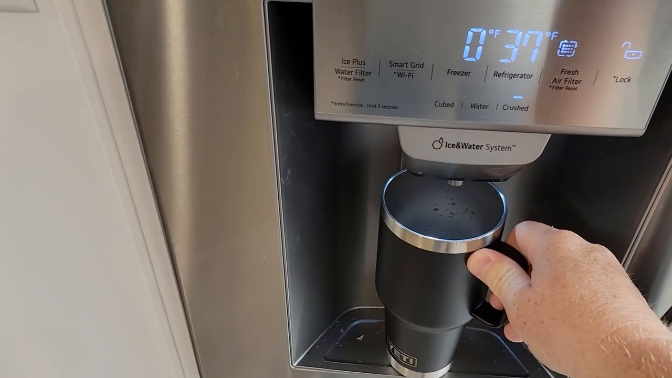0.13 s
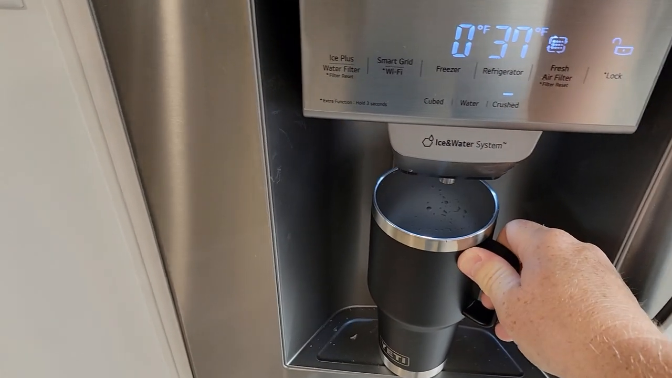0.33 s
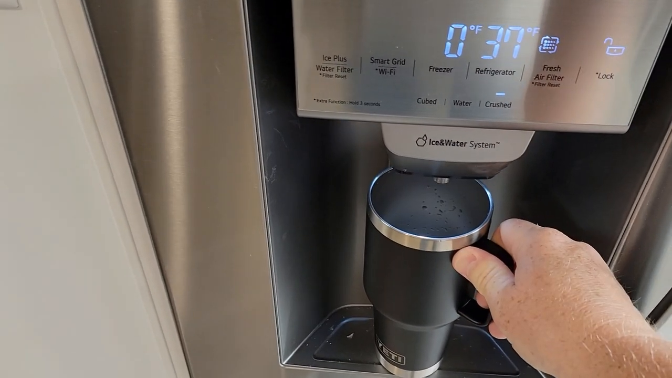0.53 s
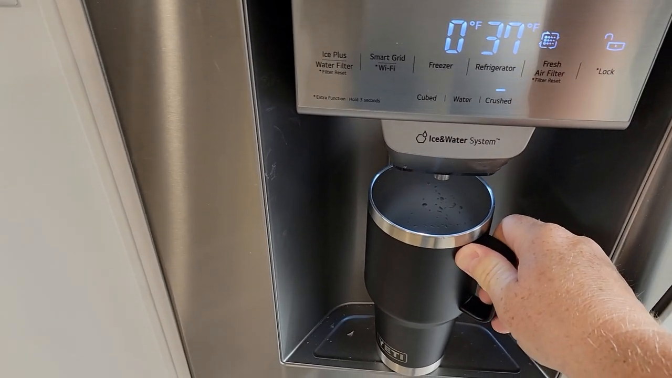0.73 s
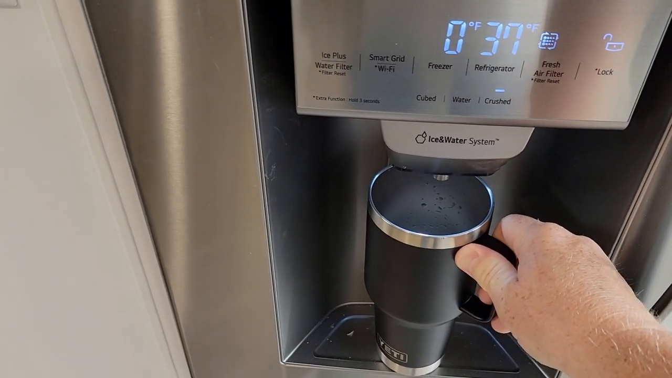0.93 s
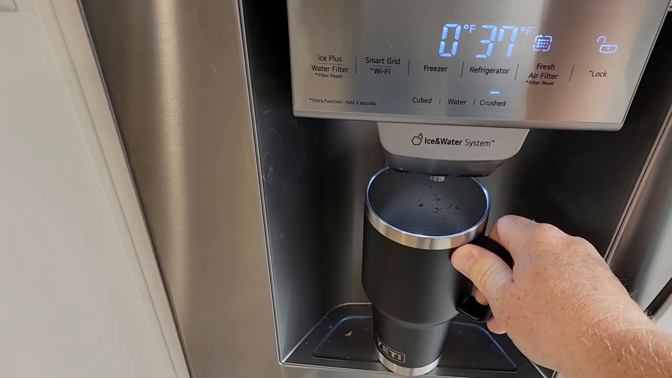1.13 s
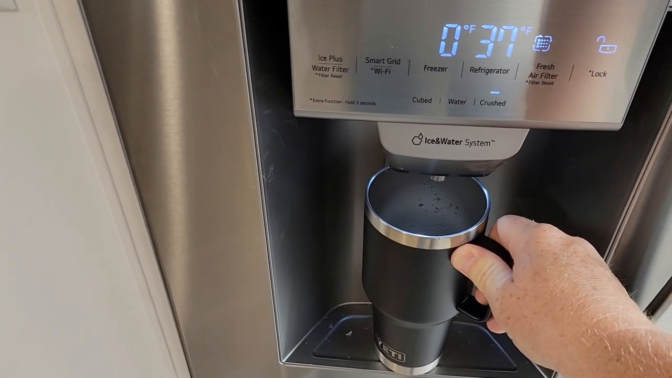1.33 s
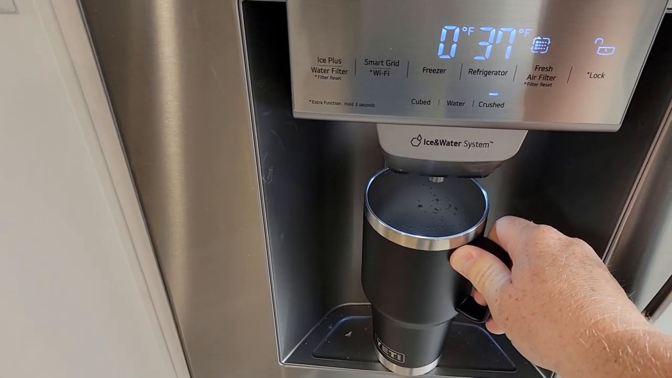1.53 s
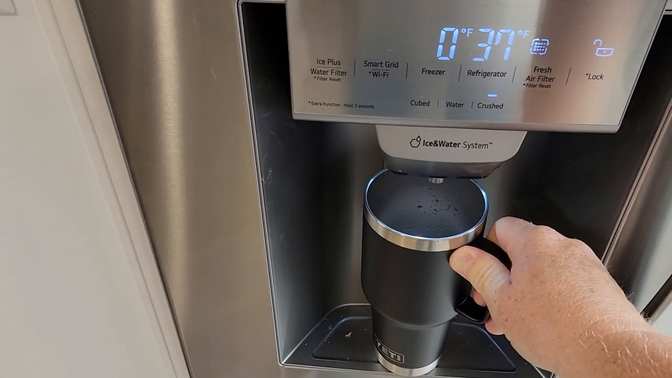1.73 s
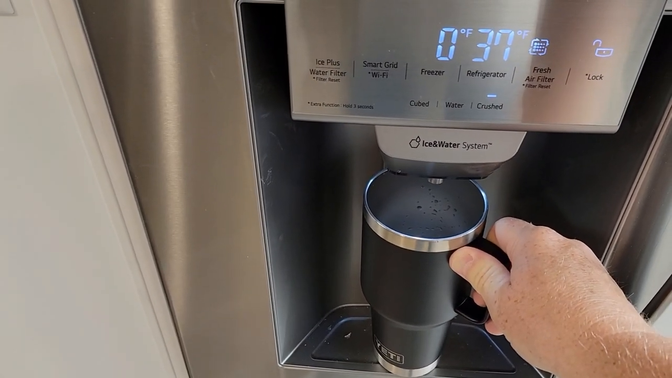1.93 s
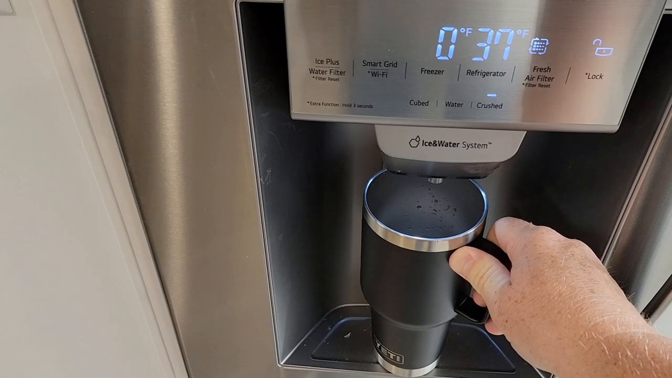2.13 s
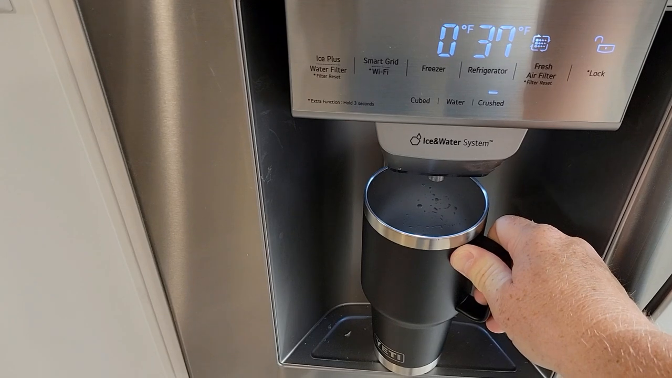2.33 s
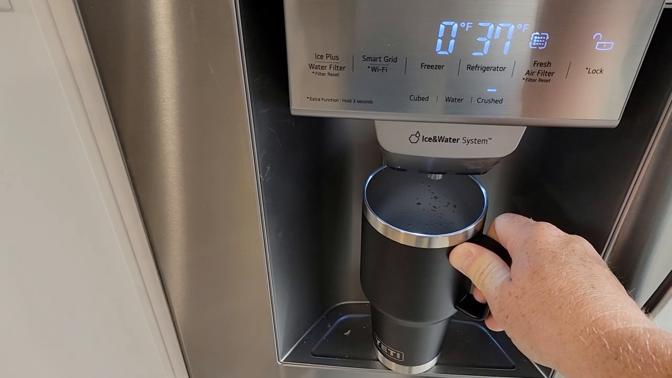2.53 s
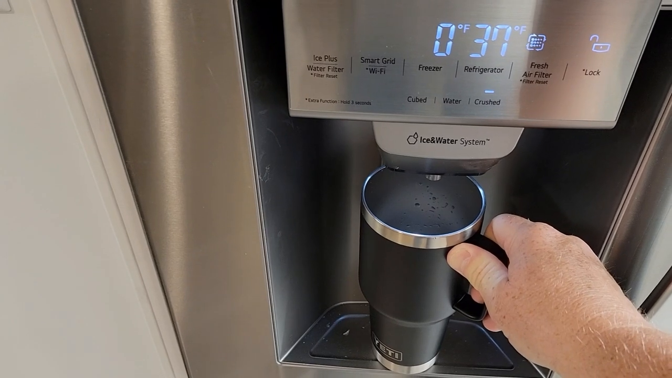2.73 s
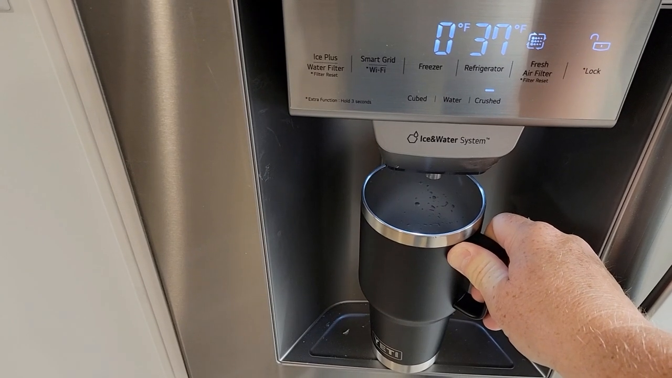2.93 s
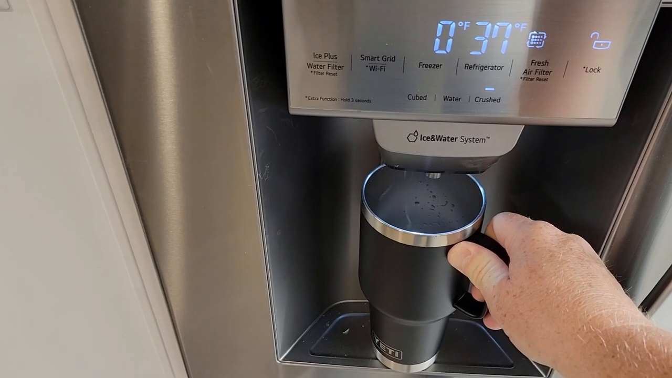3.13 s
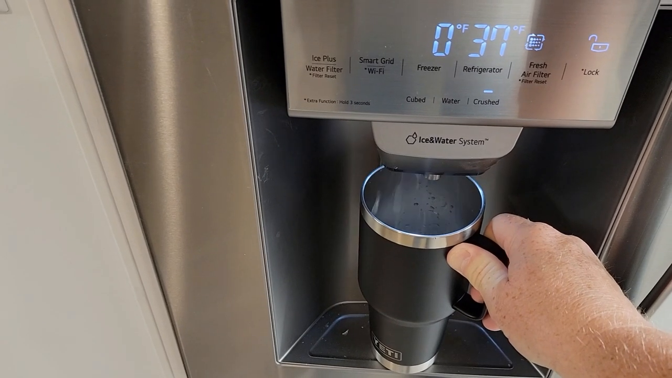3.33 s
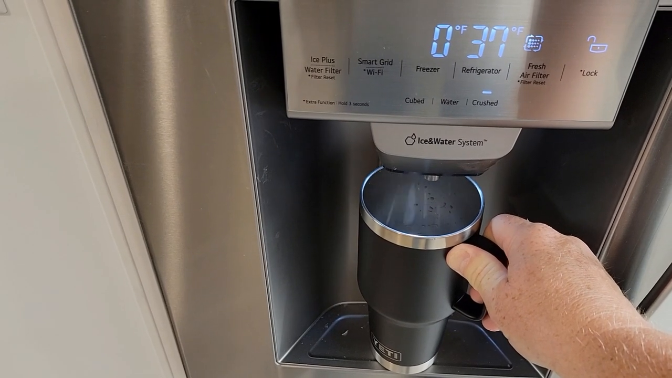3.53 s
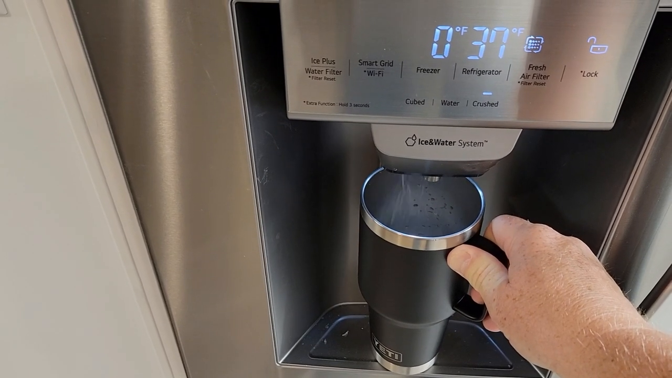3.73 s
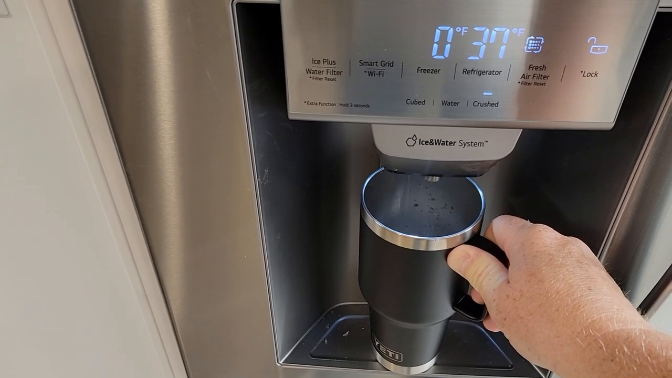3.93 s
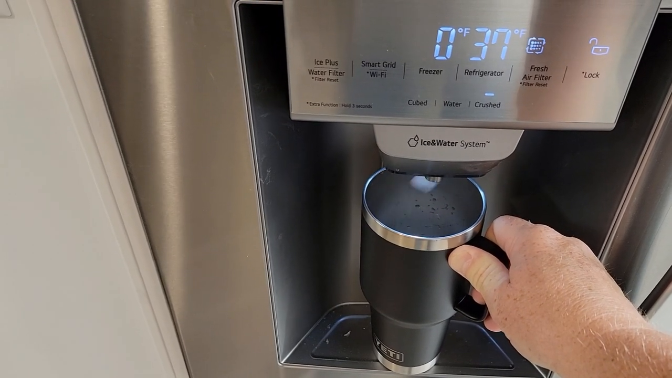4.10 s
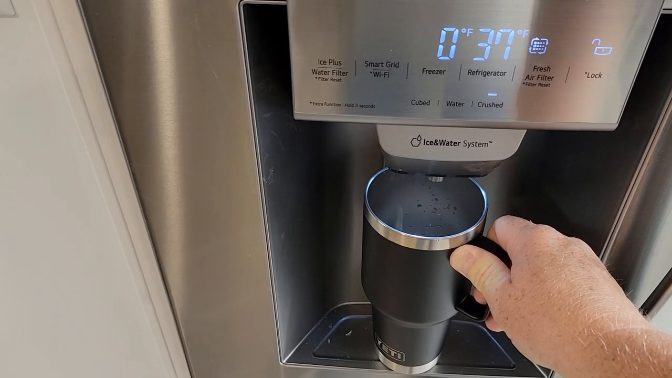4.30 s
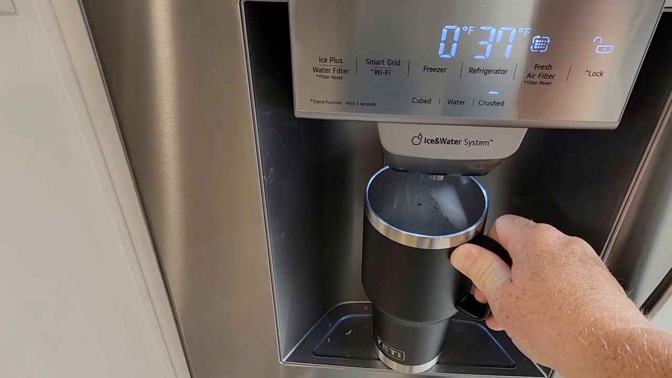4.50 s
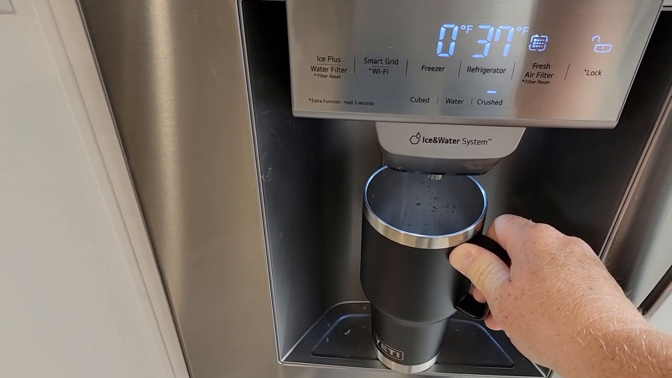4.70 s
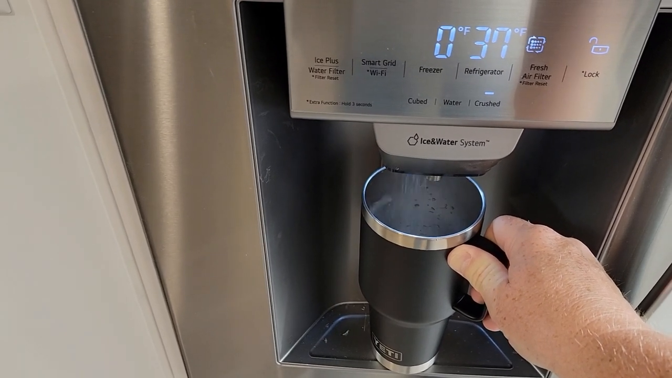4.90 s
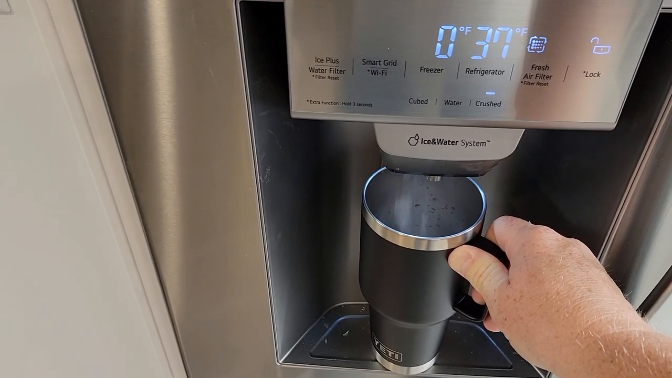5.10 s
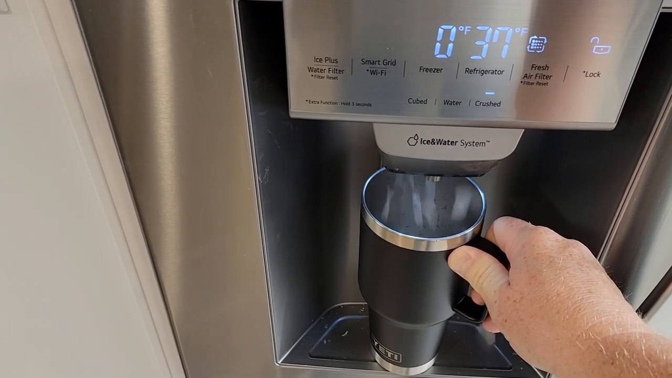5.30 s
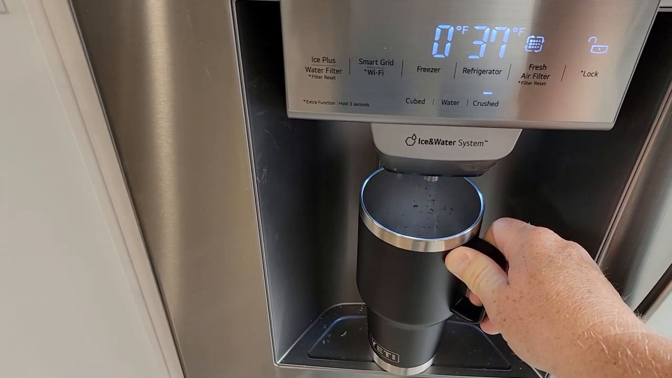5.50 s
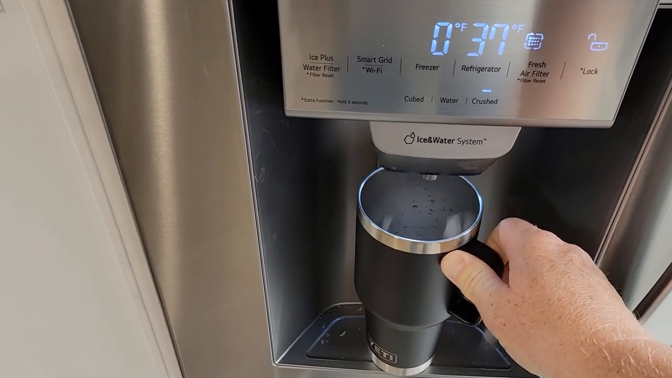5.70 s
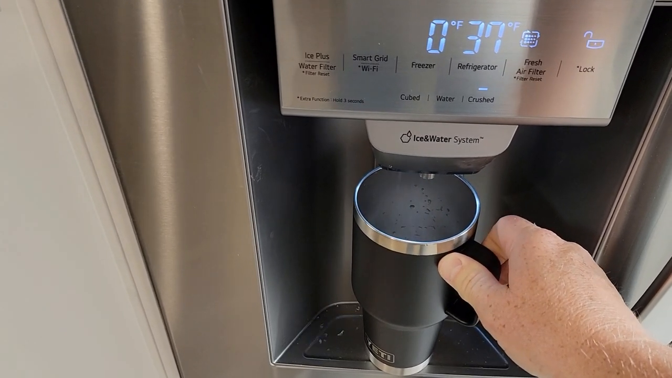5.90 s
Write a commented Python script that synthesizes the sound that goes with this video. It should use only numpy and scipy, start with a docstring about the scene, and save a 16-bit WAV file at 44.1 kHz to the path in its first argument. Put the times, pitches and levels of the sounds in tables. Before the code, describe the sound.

Nearly mono close microphone, dry indoor air with low compressor hum. Quiet creaks and a dull clunk come first, then a little geared motor runs up and holds a wavering whine. Muffled ticks and knocks thicken into loud, uneven crunching through a hollow cabinet, with fizzing ice splinters and scattered bright metallic clinks of chips dropping into a tumbler.

```python
"""An ice crusher in a refrigerator door grinds ice, and the chips clink into a steel tumbler, heard close up.
The grinding is clumpy noise through the cabinet's resonances, with a hiss of splinters on top. Single blows
are short notes with noise, and chips are noise cracks with brief notes and the tumbler's ring.
Before that the lever creaks, the chute flap clunks open and a small motor whines up, all made from tones
and noise. Behind everything the compressor hums, the room hisses and the door shakes."""
import sys
import numpy as np
from scipy import signal
from scipy.fft import rfft, irfft, next_fast_len
from scipy.io import wavfile
from scipy.ndimage import map_coordinates

SR = 44100
rng = np.random.default_rng(int(sys.argv[2]) if len(sys.argv) > 2 else 0)


def master(y):
    """Save y as 16-bit WAV."""
    cut = np.clip(np.atleast_2d(y).T, -1, 1)
    pcm = np.round(cut * 32767)  # scale
    wavfile.write(sys.argv[1], SR, pcm.astype(np.int16))


N = 266849  # length [samples]


def amp(db):
    """Turns decibels into a gain."""
    return 10 ** (np.asarray(db) / 20)


def unit(x):
    """Scales a sound to an rms of one."""
    return x / np.sqrt(np.mean(x ** 2) + 1e-20)


def seconds(count=N):
    """The time of each sample."""
    return np.arange(count) / SR


def curves(rows):
    """One value per sample for each column after the time."""
    s, *cols = np.transpose(rows)
    return [np.interp(seconds(), s, c) for c in cols]


def wobble(rate):
    """A smooth random curve with this many random points a second."""
    at = np.arange(0, N + 32, 32)
    points = rng.standard_normal(int(N * rate / SR) + 4)
    return np.interp(np.arange(N), at, map_coordinates(points, [at * rate / SR]))


def wobbles(rate, count):
    """Several independent wobbles, one per row."""
    return np.array([wobble(rate) for _ in range(count)])


def filtered(x, response):
    """Filters a sound by a (complex) response of frequency."""
    m = next_fast_len(N + SR // 2)
    return irfft(rfft(x, m) * response(np.fft.rfftfreq(m, 1 / SR)), m)[..., :N]


def colour(points):
    """Filter gain through (frequency [Hz], level [dB]) points on a log axis."""
    f, db = np.transpose(points)
    return lambda hz: amp(np.interp(np.log(hz + 1), np.log(f + 1), db))


def add(track, s, sound):
    """Mixes a sound in at a time."""
    track[round(s * SR):][:len(sound)] += sound


def swells(rows, fall_s):
    """Gain of (time [s], level [dB], rise [s]) peaks; rise and fall are times for 10 dB."""
    t = seconds()
    peaks = [amp(db - 10 * np.maximum((s - t) / rise_s, (t - s) / fall_s)) for s, db, rise_s in rows]
    return np.max(peaks, axis=0)


def grains(spread_db, life, clump_db, bed, count):
    """Dense noise puffs of unequal size with sharp fronts, in clumps; the streams share some of them."""
    sizes = amp(spread_db * np.minimum(rng.exponential(size=(count + 1, N)), 3.5))
    starts = rng.random((count + 1, N)) < 250 / SR  # about 250 puffs a second
    puffs = signal.lfilter([1], [1, -amp(-60 / SR / life)], sizes * starts)  # life: 60 dB decay [s]
    clumps = amp(clump_db * (wobble(30) + 0.87 * wobbles(25, count)))
    return (0.81 * puffs[0] + puffs[1:] + bed) * clumps * rng.standard_normal((count, N))


# resonances of cabinet and chute: (frequency [Hz], width of one pass [Hz], level [dB])
CABINET_MODES = [(172.2, 110, -12.5), (303, 113, -2), (398, 120, -3.5), (517, 150, -4), (708, 179, -0.5),
                 (954, 167, -3), (1192, 190, -5.5), (1600, 165, -5), (1850, 230, -13), (2400, 200, -18)]
SHUT_FROM_S, SHUT_UNTIL_S, SHUT_ABOVE_HZ, SHUT_DB = 1.22, 1.8, 1400, -7


def cabinet(drive):
    """One row per resonance, each applied twice for steep skirts; upper ones are quieter at motor run-up."""
    c, w, db = np.transpose(CABINET_MODES)[:, :, None]
    t = seconds()
    # above 2000 Hz the quiet stretch already begins at the start
    quiet = (c > SHUT_ABOVE_HZ) * (t < SHUT_UNTIL_S) * ((t > SHUT_FROM_S) | (c > 2000))
    resonance = lambda f: amp(db) * (f * w / (c * c - f * f + 1j * f * w)) ** 2
    return filtered(drive * amp(SHUT_DB * quiet), resonance)


# room tone and hiss: (frequency [Hz], level [dB])
ROOM_COLOUR = [(15, -64), (25, -34), (63, -15), (91, -12), (124, -2), (208, -19), (269, -13), (450, -20),
               (1090, -59), (2500, -59), (4600, -58), (5120, -48), (5700, -56), (15600, -57), (22000, -120)]


def room():
    """Steady noise shaped like the air of a kitchen."""
    return amp(-61) * unit(filtered(rng.standard_normal(N), colour(ROOM_COLOUR)))


# compressor hum before its wobble: (time [s], level [dB])
HUM_LEVEL = [(0.0, -52), (0.6, -52), (2.0, -46.5), (3.0, -46), (3.2, -51), (3.5, -48), (6.05, -46)]
HUM_HZ = 120


def compressor():
    """A hum is one low tone whose level and phase drift a little."""
    level = amp(HUM_LEVEL_DB() + 0.57 * wobble(12))
    return np.sqrt(2) * level * np.sin(2 * np.pi * HUM_HZ * seconds() + .25 * wobble(6))


def HUM_LEVEL_DB():
    """The hum level at every sample."""
    return curves(HUM_LEVEL)[0]


# the door is jolted: (start of the last 10 dB of rise [s], level [dB])
DOOR_JOLTS = [(2.962, -48), (3.145, -39), (3.292, -51), (3.453, -44), (3.728, -50), (3.8, -49),
              (3.997, -49), (4.5, -46), (4.57, -46), (4.71, -45), (4.926, -45), (5.642, -47), (5.766, -44),
              (5.85, -48)]
JOLT_RISE_S, JOLT_FALL_S = .02, .035  # for 10 dB
SHAKE_DB, SHAKE_UNDER_GRIND_DB = -68, -38  # at rest; relative to the steady grinding
THUD_S, THUD_DB, THUD_HZ, THUD_HALF_S = .16, -37, 105, .011


def door():
    """A heavy panel shakes as low noise, stronger with grinding and jolts; one soft bump is a short low tone."""
    noise = amp(2.7 * wobble(14)) * rng.standard_normal(N)
    shake = filtered(noise, colour([(15, -40), (40, -18), (80, 0.5), (200, -18), (400, -62)]))
    jolts = swells([(s + JOLT_RISE_S, db, JOLT_RISE_S) for s, db in DOOR_JOLTS], JOLT_FALL_S)
    strength = amp(SHAKE_DB) + amp(curves(GRINDING)[0] + SHAKE_UNDER_GRIND_DB) + jolts
    t = seconds() - THUD_S
    bump = amp(THUD_DB) * np.exp(-(t / THUD_HALF_S) ** 2) * np.cos(2 * np.pi * THUD_HZ * t)
    return strength * unit(shake) + bump


# noise tail of an earlier clack: (frequency [Hz], level [dB])
CLACK_COLOUR = [(600, -20), (1400, -6), (1700, 5), (2100, -8), (3600, -3), (5000, -3), (9000, -6),
                (15500, -14), (16400, -40)]
# tones still ringing from it: (frequency [Hz], level [dB], 60 dB decay [s])
CLACK_TONES = [(1680, -60, .6), (3650, -70, .4), (4940, -72, .4)]


def clack_tail():
    """What is left of an earlier clack dies away as fading noise and tones."""
    t = seconds()
    tail = amp(-54 - 60 * t / 0.3) * unit(filtered(rng.standard_normal(N), colour(CLACK_COLOUR)))
    for hz, db, t60 in CLACK_TONES:
        tail = tail + amp(db + 3 * wobble(60) - 60 * t / t60) * np.sin(2 * np.pi * hz * t)
    return tail


# small motor: (time [s], whine [Hz], whine level [dB], overtone level [dB], low order level [dB])
MOTOR_WHINE = [(1.1, 440, -120, -120, -120), (1.18, 491, -80, -66, -90), (1.27, 560, -64, -69, -85),
               (1.4, 654, -59, -63, -80), (1.49, 722, -58, -68, -66), (1.56, 775, -48.5, -78, -59),
               (1.63, 832, -56, -90, -62), (1.69, 880, -63, -92, -62), (1.77, 942, -45.5, -92, -66),
               (1.86, 1008, -47.5, -86, -69), (2.2, 1008, -47, -83, -70), (2.7, 1005, -44.5, -82, -73),
               (6.05, 1003, -43, -80, -72)]


def motor():
    """Gear mesh whine, an overtone and other shaft orders all follow the speed; load makes it waver."""
    hz, db, octave_db, low_db = curves(MOTOR_WHINE)
    load = np.interp(seconds(), [1.8, 2.1, 2.8], [.005, .003, .01])
    turn = 2 * np.pi * np.cumsum(hz * (1 + load * wobble(60))) / SR
    orders = np.sin(0.405 * turn) + 0.4 * np.sin(0.59 * turn)
    orders = orders + .3 * np.sin(1.19 * turn) + .2 * np.sin(1.55 * turn)
    tone = amp(db) * np.sin(turn) + amp(octave_db) * np.sin(2 * turn) + amp(low_db) * orders
    return np.sqrt(2) * amp(3.5 * wobble(45)) * tone


# faint ticks in the ice bin and lever, before muffling: (time [s], level [dB])
BIN_TICKS = [(0.4365, -61), (0.7478, -63), (1.0352, -57), (1.1364, -40), (1.8094, -51), (1.8458, -49),
             (1.9546, -45), (1.977, -36), (2.0758, -44), (2.1242, -49), (2.192, -48), (2.2509, -46),
             (2.2958, -50), (2.3631, -47), (2.4026, -35), (2.4829, -38), (2.6166, -36), (2.648, -39),
             (2.7118, -43)]
# tone colour heard through the door: (frequency [Hz], level [dB])
MUFFLED_COLOUR = [(1530, -32), (2810, -24), (3300, -12), (4500, -8), (4980, 0), (5500, -7), (6100, -5),
                  (6900, -7), (8000, -22), (15600, -37), (22000, -120)]


def ticks():
    """Short dull clicks are noise bursts with a little tail, muffled by the door."""
    puff, t = np.zeros(N + SR), seconds(SR // 5)
    for s, db in BIN_TICKS:
        fade = amp(db - 1 - 60 * t / 0.035) + amp(db - 10 - 60 * t / .25)
        add(puff, s, fade * rng.standard_normal(len(t)))
    return filtered(puff[:N], colour(MUFFLED_COLOUR))


# blows of lever, flap and breaking ice: (time [s], relative level [dB], pitch [Hz], 60 dB decay [s])
CABINET_BLOWS = [(0.747, -41, 1240, 0.032), (0.8, -37, 307, 0.05), (0.829, -32, 708, 0.04),
                 (0.882, -39, 383, 0.05), (1.034, -43.5, 750, 0.047), (1.135, -26, 452, .07),
                 (1.139, -21, 296, 0.1), (1.163, -34, 320, .05), (1.822, -25.5, 983, 0.05),
                 (1.957, -25, 1000, 0.06), (2.24, -27, 1012, 0.059), (2.4, -22.5, 750, 0.052),
                 (2.499, -23, 980, 0.05), (2.568, -18.5, 742, 0.05), (2.678, -12.5, 710, 0.05),
                 (2.933, -7, 467, 0.05), (2.955, -7, 450, 0.04), (2.98, -3.5, 718, 0.05),
                 (3.08, -13, 900, .04), (3.126, -3.5, 581, 0.05), (3.157, 1.5, 520, 0.035),
                 (3.226, -7, 1000, 0.05), (3.294, -9, 757, 0.05), (3.463, -10.5, 464.4, 0.05),
                 (3.688, -13, 299, 0.08), (3.729, -2, 694, 0.039), (3.795, -9, 980, 0.05),
                 (3.982, -13.5, 996, 0.048), (4.008, -17, 1200, .03), (4.053, -13.5, 1530, 0.038),
                 (4.42, -6, 730, 0.047), (4.459, -8, 684, .04), (4.494, -7, 832, 0.047),
                 (4.564, -7.5, 910, 0.054), (4.659, -9, 299, 0.091), (4.787, -8, 388, .06),
                 (4.814, -8, 361, .04), (4.932, -5, 390, 0.045), (4.972, -14, 431, .04),
                 (5.061, -10, 900, .04), (5.075, -9, 700, .04), (5.161, -11, 711, .04),
                 (5.402, -15, 1490, 0.04), (5.463, -13, 1450, .04), (5.592, -6.5, 1189, 0.05),
                 (5.635, -10, 700, .04), (5.803, -9, 690, 0.048), (5.817, -3, 1750, .03),
                 (5.83, -10, 700, .03), (5.873, -12, 1300, .03), (5.897, -13, 1500, .03),
                 (5.923, -4, 754, 0.068), (5.966, 4.5, 1236, 0.035)]


def crunches():
    """Each blow rings at its own pitch, dies fast, and sends a short noise puff through the cabinet."""
    ring, puff, t = np.zeros(N + SR), np.zeros(N + SR), seconds(SR // 4)
    for s, db, hz, t60 in CABINET_BLOWS:
        front = amp(db) * (1 - np.exp(-t / 0.0014))
        add(ring, s, 0.52 * front * amp(-60 * (t / t60) ** 1.2) * np.sin(2 * np.pi * hz * t))
        add(puff, s, 2.6 * front * amp(-65 * t / t60) * rng.standard_normal(len(t)))
    uneven = amp(2.57 * wobbles(18, len(CABINET_MODES)))
    body = cabinet(puff[None, :N] * uneven).sum(0)
    return filtered(ring[:N], lambda hz: 1j * hz / (120 + 1j * hz)) + body  # less bass in the ring


# chips striking steel or cracking: (time [s], relative level [dB], brightness [dB],
# ring of the tumbler [dB], pitch of the piece [Hz])
ICE_CHIPS = [(2.7748, -25, -11, -25, 4970), (2.9344, -24, -9, -25, 7330), (2.9649, -21, -7, -25, 4540),
             (2.9808, -17, -10, -25, 4950), (3.1245, -23, -7, -25, 4980), (3.1599, -19, -10, -25, 3040),
             (3.2981, -18, -8, -25, 5030), (3.3874, -13, -12, -3, 3530), (3.4183, -19, -10, -16, 5660),
             (3.4617, -12, -9, -15, 6010), (3.5251, -20, -1, -10, 7820), (3.7326, -24, -9, -11, 6230),
             (3.7621, -22, -6, -10, 5080), (3.801, -13, -15, -15, 4940), (3.8972, -19, -9, -1, 5740),
             (3.9057, -18, -3, -3, 3520), (3.9814, -23, -6, -14, 5580), (4.0265, -17, -1, 0, 7450),
             (4.1626, -9, -3, -5, 5730), (4.3098, -16, -7, -4, 4930), (4.3417, -20, -3, -3, 7450),
             (4.437, -21, -9, -10, 5080), (4.462, -23, -9, -4, 2620), (4.4739, -21, -10, -14, 4770),
             (4.4959, -19, -11, -10, 5070), (4.5612, -12, -10, -15, 4800), (4.5992, -12, -7, -11, 3590),
             (4.6276, -16, -9, -14, 4500), (4.646, -12, -8, -5, 5730), (4.7323, -12, -5, -8, 10100),
             (4.7901, -19, -8, -11, 5020), (4.8601, -19, -10, -15, 5590), (4.9489, -20, 3, -8, 10200),
             (5.0012, -14, -6, -12, 3560), (5.0781, -19, -6, -16, 5000), (5.106, -16, -7, -7, 3520),
             (5.194, -19, -6, -11, 9780), (5.309, -19, -11, -13, 3320), (5.3479, -20, -9, -13, 3790),
             (5.402, -11, -8, -12, 5630), (5.4105, 0, -8, -17, 3260), (5.463, -17, -3, -12, 10000),
             (5.4916, -13, -7, -14, 4980), (5.516, -19, -2, -14, 9900), (5.5575, -16, -4, -8, 5760),
             (5.6358, -21, -9, -14, 6560), (5.8174, -3, -11, -24, 4910), (5.8723, -16, -11, -14, 4910),
             (5.8957, -16, -11, -14, 3490), (5.9246, -21, -11, -16, 2830), (5.9446, -19, -10, -14, 2900),
             (6.0184, -21, -10, -17, 4240)]
SHARD_SPREAD, SHARD_T60_S, SHARD_DB = .2, .024, -14  # scatter of log pitch, decay, level


def shards():
    """The ice itself sounds: every chip gives six brief notes around its own pitch."""
    track, t = np.zeros(N + SR), seconds(SR // 20)
    for s, db, *_, hz in ICE_CHIPS:
        pitch, size, phase = rng.standard_normal((3, 6, 1))
        note_hz = hz * np.exp(SHARD_SPREAD * np.clip(pitch, -2, 2) ** 3 / 4)
        notes = np.sin(2 * np.pi * (note_hz * t + phase))
        fade = amp(db + SHARD_DB + 2.5 * size - 60 * t / SHARD_T60_S)
        add(track, s, (fade * notes).sum(0) * (1 - np.exp(-t / .0012)))
    return track[:N]


# ringing modes of the steel tumbler: (frequency [Hz], level [dB], 60 dB decay [s])
STEEL_MODES = [(3418, -10, .2), (3532, -3, 0.24), (4270, -12, 0.17), (4980, -10, 0.18), (5249, -12, .25),
               (5577, -6, 0.3), (5658, -9, 0.45), (5750, -4.5, 0.18), (6900, -12, 0.2), (7474, -8, 0.33),
               (7828, -11, 0.3), (8370, -17, 0.3), (9137, -12, 0.55), (9730, -14, .2), (11200, -19, 0.2),
               (12750, -20, 0.18), (13070, -16, 0.15)]
# tone colour of ice splinters: (frequency [Hz], level [dB])
SPLINTER_COLOUR = [(400, -50), (1180, -9), (2000, -1), (2720, -8.5), (3510, -4), (4490, -6), (4950, 0),
                   (5360, -5), (6000, -3), (6800, -7), (7400, -4), (8200, -9), (10000, -10.5), (15100, -22),
                   (16400, -25)]
BRIGHT_HZ = 7000  # brightness sets the crack above this


def chips():
    """Each chip cracks and rings the tumbler's modes at new strengths; sliding ice makes the ring flutter."""
    count = len(STEEL_MODES)
    ring, crack, t = np.zeros((count, N + SR)), np.zeros((2, N + SR)), seconds(SR // 3)
    modes = np.array([amp(level - 60 * t / t60) * np.sin(2 * np.pi * (hz * t + rng.random()))
                      for hz, level, t60 in STEEL_MODES])
    modes = modes * (1 + 1.1 * amp(-60 * t / .06)) * (1 - np.exp(-t / .0005))  # stronger at first
    for s, db, bright_db, ring_db, _ in ICE_CHIPS:
        strengths = amp(db + ring_db - 14.5 + rng.normal(0, 2.8, (count, 1)))
        ring[:, round(s * SR):][:, :len(t)] += strengths * modes
        fade = amp(db - 10 - 60 * t / 0.019) + amp(db - 20.5 - 60 * t / .14)
        burst = fade * (1 - np.exp(-t / .0008)) * rng.standard_normal(len(t))
        add(crack[0], s, burst)
        add(crack[1], s, amp(bright_db) * burst)
    flutter = amp(3.2 * wobbles(110, count))
    low = lambda hz: 1 / (1 + (hz / BRIGHT_HZ) ** 4)
    no_bass = lambda hz: hz ** 4 / (hz ** 4 + 1900 ** 4)
    bands = lambda hz: colour(SPLINTER_COLOUR)(hz) * no_bass(hz) * [low(hz), 1 - low(hz)]
    # steady noise shows how loud each band is, so both can be levelled
    loudness = np.std(filtered(rng.standard_normal((2, N)), bands), axis=1)[:, None]
    return (ring[:, :N] * flutter).sum(0) + (filtered(crack[:, :N], bands) / loudness).sum(0)


# steady grinding under the surges: (time [s], cabinet rattle [dB], lift of its low resonances [dB],
# splinter fizz [dB])
GRINDING = [(0.0, -52, -4, -90), (0.3, -80, 5, -90), (0.74, -84, 5, -90), (0.8, -63, 5, -90),
            (1.78, -62, 3, -91), (1.83, -45, -3, -78), (2.0, -43, -4, -73), (2.6, -39.5, -3, -63),
            (2.78, -27, 0, -46), (3.0, -25, -2, -41), (3.25, -30, -1, -40), (3.36, -27, 7, -40),
            (3.55, -33, 0, -37), (3.62, -33, 0, -44), (3.72, -32, 4, -41), (4.1, -36, -2, -42),
            (4.3, -33, -1, -44), (4.42, -24, 2, -34), (4.7, -24, 1, -31), (4.85, -24, 5, -34),
            (5.15, -25, 0, -34), (5.25, -32, -6, -38), (5.4, -32, -6, -37), (5.44, -29, -6, -29),
            (5.57, -29, -6, -34), (5.62, -23, -7, -36), (6.05, -21, -4, -36)]
# strain builds up and lets go (lever creak, flap, chunks breaking):
# (time of the peak [s], rattle level [dB], build-up for 10 dB [s])
STRAIN_SURGES = [(0.0, -42, .01), (0.755, -52, .004), (0.81, -52, .01), (0.835, -49, .02), (0.91, -53, .04),
                 (1.05, -55, .02), (1.09, -58, .03), (1.147, -47, .006), (1.97, -36, .03), (2.88, -18, .1),
                 (2.98, -15, .04), (3.13, -16, .03), (3.165, -17, .006), (3.24, -23, .015), (3.3, -19, .01),
                 (3.47, -19, .03), (3.74, -17, .045), (3.81, -19, .02), (4.21, -27, .08),
                 (4.43, -19.5, .06), (4.5, -16, .06), (4.53, -19, .03), (4.67, -20, .1), (4.82, -20, .05),
                 (4.88, -21, .05), (5.07, -19, .08), (5.18, -19.5, .05), (5.22, -24, .02), (5.6, -21, .015),
                 (5.64, -19, .015), (5.81, -18, .02), (5.97, -18, .08)]
# splinters of four sizes, each with its own bursts: (frequency [Hz])
FIZZ_CENTRES = [2500, 4300, 6500, 10000]
LET_GO_S = .022  # a surge falls 10 dB in this time
DULL_SPRAY_DB, BITING_SPRAY_DB = -34, -21  # fizz under a surge's rattle, before and after the blades bite
LOW_HZ = 450  # the resonances under this are the low ones
SING_DB, SING_WIDTH_HZ = -8.5, 30  # tumbler singing: level under the fizz, width of each mode
FIRST_DROP_S = 3.38  # the fizz makes no tumbler sing before this


def crusher():
    """Breaking ice drives the cabinet; fine splinters fizz, dull until the blades bite, and sing in steel."""
    rattle_db, low_db, fizz_db = curves(GRINDING)
    surge = swells(STRAIN_SURGES, LET_GO_S)
    rows = cabinet(grains(3.6, 0.027, clump_db=1.5, bed=2.25, count=len(CABINET_MODES)))
    low = np.array(CABINET_MODES)[:, :1] < LOW_HZ
    rattle = (rows * amp(low * low_db)).sum(0) / np.std(rows.sum(0))

    centre = np.log(FIZZ_CENTRES)
    # neighbouring bands fade into each other
    share = lambda hz: np.sqrt([np.interp(np.log(hz + 1), centre, row) for row in np.eye(len(centre))])
    fine = filtered(grains(4.2, 0.021, clump_db=2.1, bed=1.9, count=len(centre)), share).sum(0)
    biting = np.interp(seconds(), [2.63, 2.85], [0, 1])
    sharp = unit(filtered(fine, colour(SPLINTER_COLOUR)))
    dull = unit(filtered(fine, colour(MUFFLED_COLOUR)))
    steel = lambda f: sum(amp(db) * 1j * f * SING_WIDTH_HZ / (c * c - f * f + 1j * f * SING_WIDTH_HZ)
                          for c, db, _ in STEEL_MODES)
    singing = amp(SING_DB) * (np.arange(N) > FIRST_DROP_S * SR) * unit(filtered(fine, steel))
    fizz = biting * sharp + (1 - biting) * dull + singing
    spray = surge * amp(np.interp(biting, [0, 1], [DULL_SPRAY_DB, BITING_SPRAY_DB]))
    return np.hypot(amp(rattle_db), surge) * rattle + np.hypot(amp(fizz_db), spray) * fizz


# what differs between left and right: (frequency [Hz], level relative to the middle [dB])
SIDE_COLOUR = [(25, -19), (70, -36), (1500, -42), (4000, -51), (12000, -32)]


def scene():
    """Almost mono: a faint blurred share of the sound differs between left and right."""
    background = room() + compressor() + door() + clack_tail()
    mid = background + motor() + ticks() + crunches() + shards() + chips() + crusher()
    blur = rng.standard_normal(600) * amp(-60 * np.arange(600) / 600)
    blurred = signal.fftconvolve(mid, blur / np.linalg.norm(blur))[:N]
    side = filtered(blurred, colour(SIDE_COLOUR))
    return np.array([mid + side, mid - side])


TOP_HZ = 15900  # the treble is nearly gone here


def record(dry):
    """Peaks saturate softly; the top treble is cut off."""
    soft = dry / (1 + np.abs(dry / .95) ** 6) ** (1 / 6)
    return filtered(soft, lambda hz: np.interp(hz, [TOP_HZ - 100, TOP_HZ, 16500, 16510], [1, .03, .01, 0]))


dry = scene()
out = record(dry)
master(out)
```